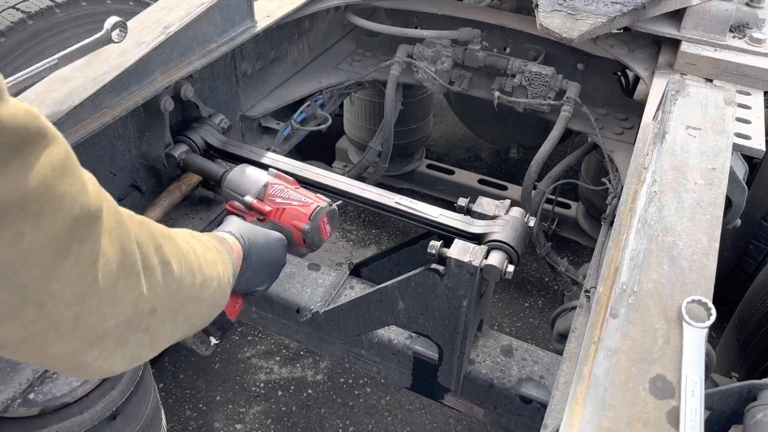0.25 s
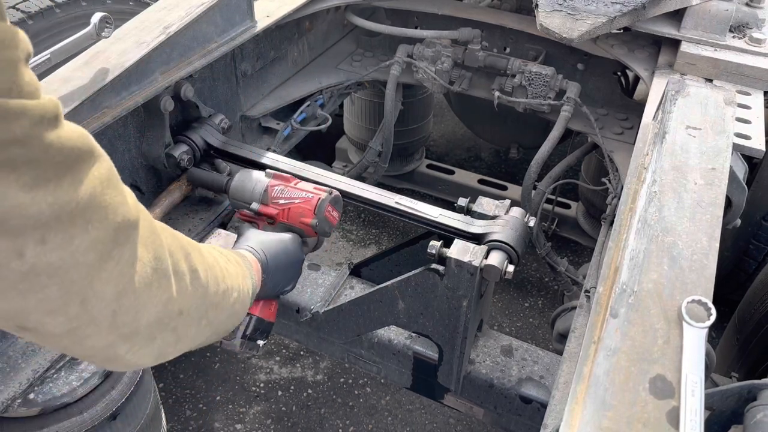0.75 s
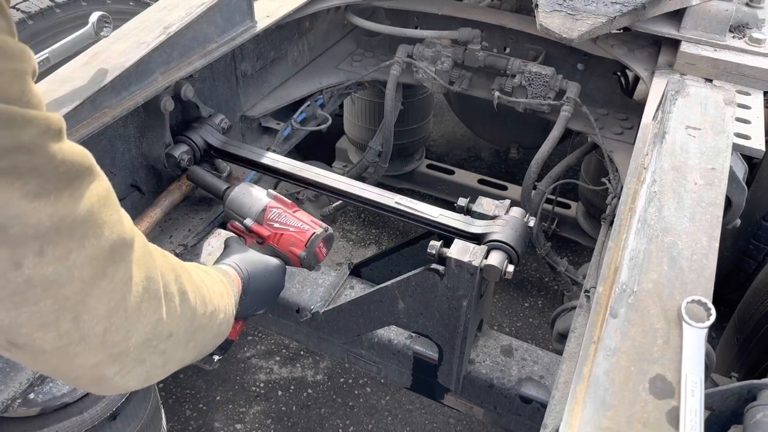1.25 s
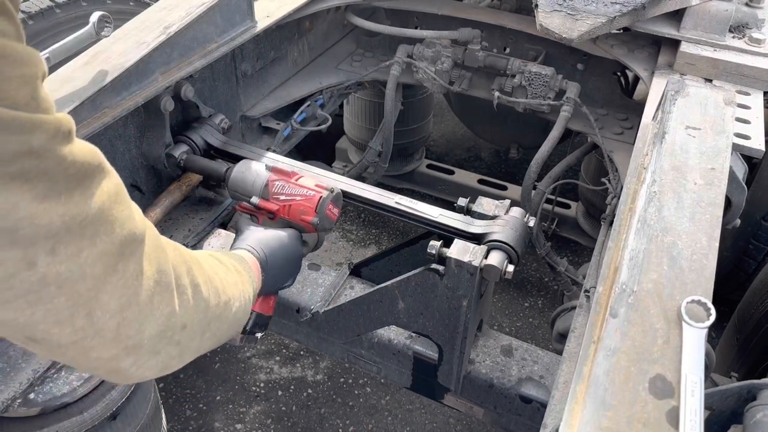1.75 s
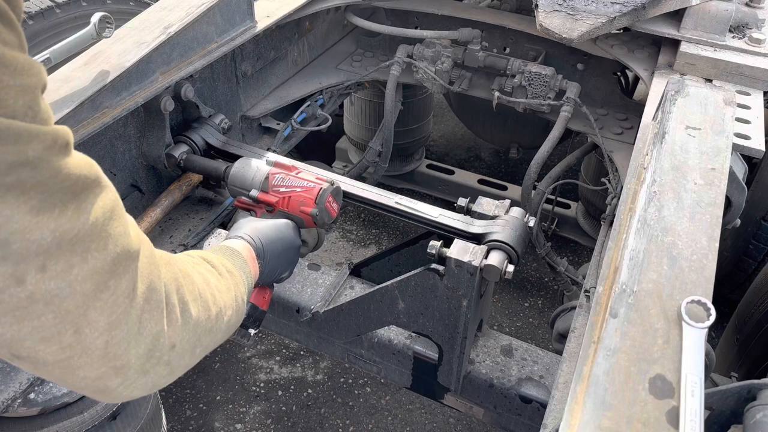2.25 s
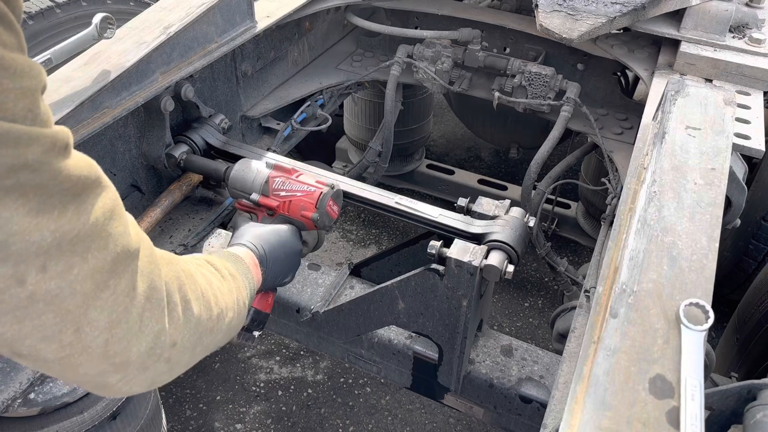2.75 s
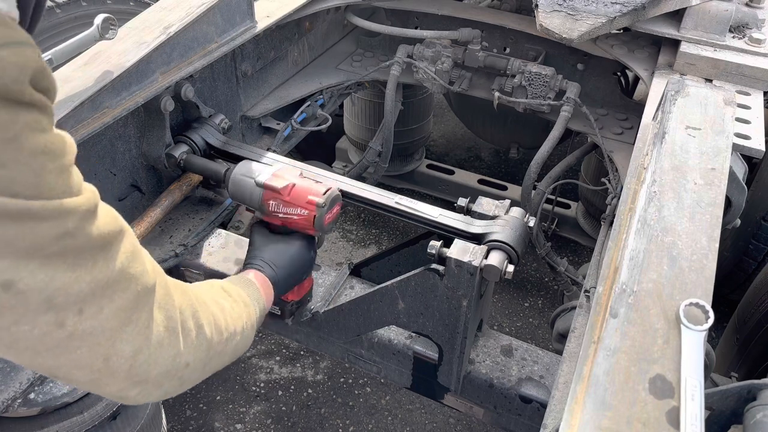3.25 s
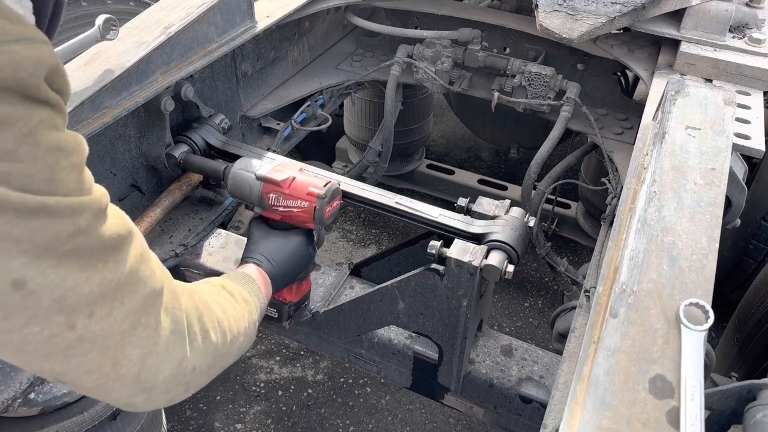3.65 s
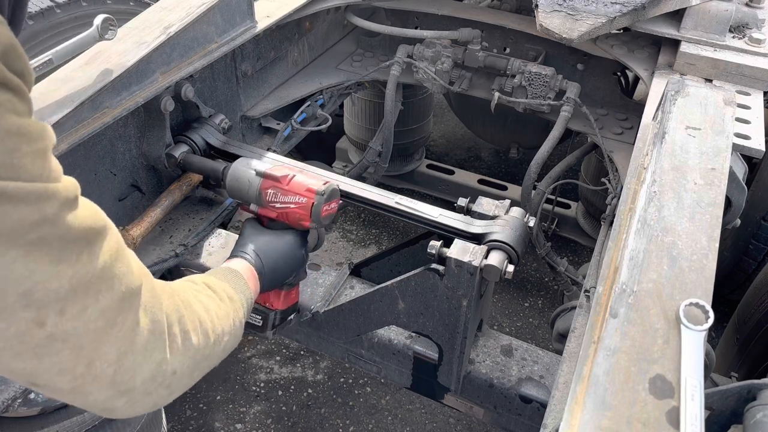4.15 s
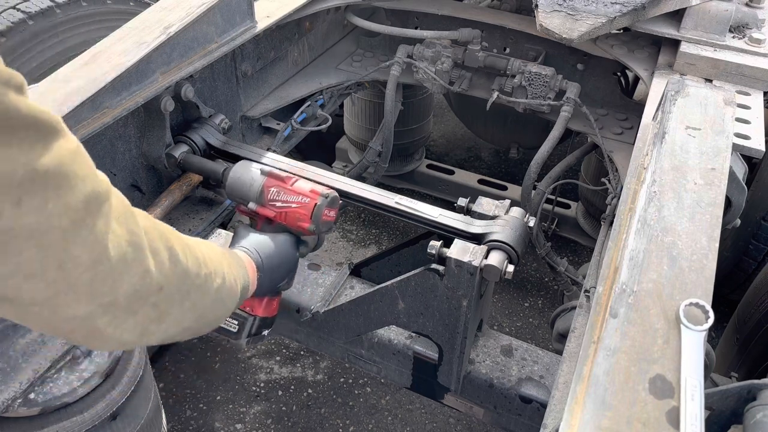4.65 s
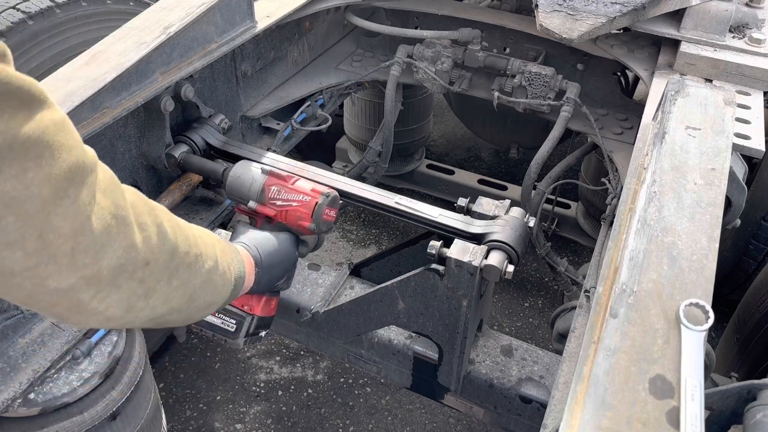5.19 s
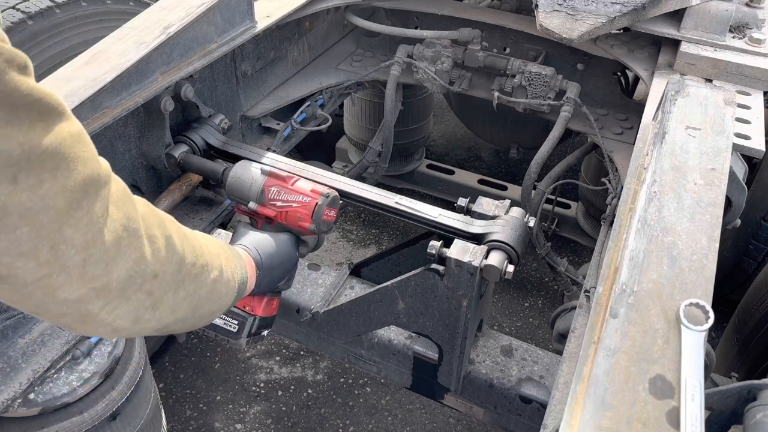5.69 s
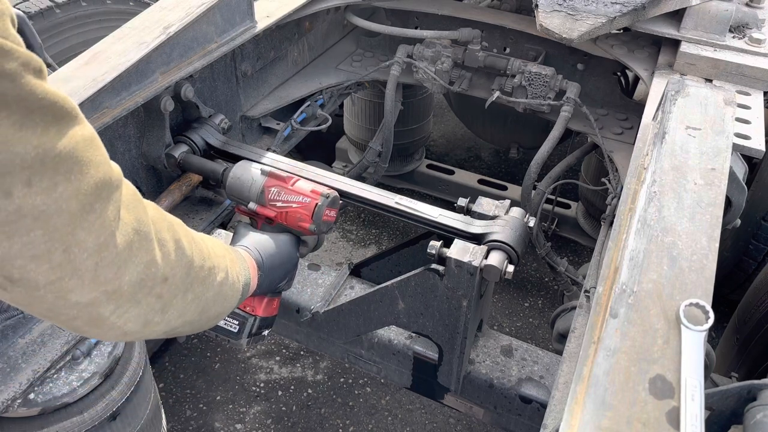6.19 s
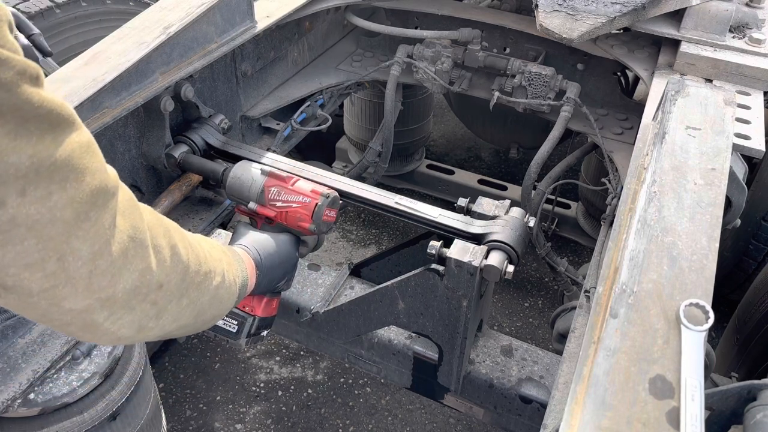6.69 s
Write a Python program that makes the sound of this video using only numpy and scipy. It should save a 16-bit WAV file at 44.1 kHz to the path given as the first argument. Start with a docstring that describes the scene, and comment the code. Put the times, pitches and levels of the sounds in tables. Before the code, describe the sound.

Close stereo pickup in a quiet open yard: irregular metallic knocks with short, dull frame resonance, one sharper clank before a second. A very brief impact wrench burst rattles hard, with a high electric whine and raspy gears. Afterward come fainter bumps, then brighter loose clinks with short grinding rubs. Low wind gusts flutter and thump right on the microphone over faint distant air noise and a thin high whistle.

```python
"""A cordless impact wrench at work outdoors: its socket is knocked onto a bolt in a truck's steel frame.
The motor whines up, the hammer strikes seven blows, then the socket clinks as it is worked on the bolt head.
Contacts are noise bursts plus decaying modes; the motor is tones and rasping noise; slides are runs of slips.
Close to the microphone gusts buffet its two ports; behind lie a quiet yard and a thin whistle."""
import sys
import numpy as np
from scipy import signal
from scipy.fft import rfft, irfft, next_fast_len
from scipy.io import wavfile
from scipy.ndimage import uniform_filter1d

SR = 44100
rng = np.random.default_rng(int(sys.argv[2]) if len(sys.argv) > 2 else 0)


def store_wav(level_fs):
    """Save 16-bit WAV to argv[1]."""
    pcm = np.round(np.clip(np.atleast_2d(level_fs), -1, 1) * 32767)
    wavfile.write(sys.argv[1], SR, pcm.T.astype(np.int16))


N = 305480
TIME = np.arange(N) / SR
AGE = TIME[:SR // 4]  # seconds since a touch

# Hammer on anvil, about 38 blows a second. Each row: time in seconds, force in dB,
# hardness in dB per octave, pitch of the spot struck in Hz.
HAMMER_BLOWS = [(2.23, -34, 1.5, 2330), (2.2521, -29, .6, 4400), (2.2817, -29, 0, 2830),
                (2.3085, -29.5, 0.7, 4800), (2.3326, -28, -1.2, 3600), (2.36, -29, -0.5, 1270),
                (2.3871, -30, 0, 3300)]
# Modes of the truck frame. Each row: pitch in Hz, relative level in dB, t60 in seconds.
FRAME_MODES = [(247, -3, .14), (325, -5, .17), (371, -10, .2), (476, -1, .17), (698, -10, .15),
               (782, -10, .13), (984, -11, .12), (1060, -11, .11), (1205, -10, .11), (1340, -10, .11),
               (1489, -4, .1), (1602, -11, .13), (1686, -13, .13), (1839, -9, .13), (1890, -13, .1),
               (2007, -13, .1), (2196, -13, .13), (2304, -9, .14), (2645, -11, .11), (3116, -9, .1),
               (3515, -9, .1), (3651, -9, .11), (3925, -6, .08), (4050, -6, .075), (4194, -9, .085),
               (4325, -14, .11), (4641, -13, .11)]
# Modes of the socket. Each row: pitch in Hz, relative level in dB, t60 in seconds before any damping.
SOCKET_MODES = [(1075, -6, .09), (1275, -13, .09), (1460, -7, .09), (2018, -10, .1), (2304, -11, .11),
                (2589, -13, .1), (2955, -10, .1), (3270, -10, .1), (3332, -20, .2), (3714, -10, .12),
                (3946, -11, .14), (4160, -15, .15), (4870, -7, .1), (4947, -8, .1), (5167, -10, .11),
                (5625, -14, .1), (5883, -16, .1), (6384, -14, .1), (6767, -16, .22), (7430, -13, .14),
                (7607, -14, .1), (7795, -13, .1), (8933, -7, .1), (9212, -8, .11), (9300, -9, .085),
                (11860, -12, .12), (12600, -12, .14), (13320, -11, .16), (14470, -5, .08),
                (15660, -11, .11)]
# How alike the two ports hear diffuse sound. Each row: pitch in Hz, left-right correlation.
LIKENESS = [(50, 0.86), (300, 0.77), (800, 0.27), (1700, 0.38), (4000, 0.42), (6700, 0.45), (9200, 0.8),
            (14000, 0.97)]
# Edges of the thud, clank, clink, tick and fizz ranges, in Hz.
ZONES_HZ = [140, 560, 2500, 5600, 10500, 16500]
RECOIL_DELAY_S = 0.00585  # from the touch to the spring-back


def from_db(db):
    """Decibels to gain."""
    return 10 ** (np.asarray(db) / 20)


def rms_one(x):
    """Scale to rms 1."""
    return x / np.sqrt(np.mean(x ** 2) + 1e-20)


def at_hz(points, hz):
    """Read a table on a log-frequency axis."""
    points = np.array(points)
    return np.interp(np.log(hz + 1e-9), np.log(points[:, 0]), points[:, 1])


def add(out, s, sound):
    """Mix a sound in at time s."""
    start = int(s * SR)
    out[:, start:start + sound.shape[-1]] += sound[..., :N - start]


def noise(spectrum, size):
    """Coloured stereo noise at rms 1, its likeness between the ports set for each pitch."""
    padded = next_fast_len(size)
    hz = np.arange(padded // 2 + 1) * SR / padded
    mid, side = rfft(rng.standard_normal((2, padded)))
    alike = np.clip(at_hz(LIKENESS, hz), -.99, .99)
    both = np.sqrt(1 + alike) * mid + np.sqrt(1 - alike) * side * [[1], [-1]]
    coloured = both * from_db(at_hz(spectrum, hz))
    return rms_one(irfft(coloured, padded)[:, :size])


def drift(rate):
    """Slow chance: straight lines between random values of spread 1, `rate` of them a second."""
    return np.interp(TIME * rate, np.arange(4000), rng.standard_normal(4000))


def band(x, low_hz, high_hz):
    """Causal band-pass."""
    return signal.sosfilt(signal.butter(4, [low_hz, high_hz], "band", fs=SR, output="sos"), x)


def evened(x, span_s):
    """Noise with its slow swings of level taken out."""
    power = uniform_filter1d(np.mean(x ** 2, axis=0), int(span_s * SR))
    return x / np.sqrt(power + 1e-6)


def held(start_s, end_s, attack_s, release_db_per_s):
    """Envelope: swell, hold, die away."""
    swell = np.clip((TIME - start_s) / attack_s, 0, 1) ** 2
    return swell * from_db(-release_db_per_s * np.clip(TIME - end_s, 0, 1))


def mode(hz, t60):
    """A decaying sine; the less alike the ports are at its pitch, the more its phase differs between them."""
    build_cycles = 3.4
    scatter = np.sqrt(-np.log(np.clip(at_hz(LIKENESS, hz), .05, .99)))
    phase = rng.uniform(0, 2 * np.pi) + rng.normal(0, scatter, (2, 1))
    build = 1 - np.exp(-AGE * min(hz, 2500) / build_cycles)
    return np.sin(2 * np.pi * hz * AGE + phase) * from_db(-60 * AGE / t60) * build


def resonant(colour):
    """A spectrum broken up by a steel body's many small resonances, drawn once for each call."""
    hz = np.geomspace(600, 16500, 420)
    peaks_db = rng.normal(0, 5.5, len(hz))
    # level the local power, so that the broad colour stays
    peaks_db = peaks_db - 10 * np.log10(uniform_filter1d(from_db(peaks_db) ** 2, size=9))
    bass = [row for row in colour if row[0] < hz[0]]
    return bass + list(zip(hz, at_hz(colour, hz) + peaks_db + 1.5))


def contact(force_db, hardness, share_db):
    """Level of each range: force lifts them all, hardness tilts those above the clank."""
    centres_hz = np.sqrt(np.multiply(ZONES_HZ[:-1], ZONES_HZ[1:]))
    octaves_up = np.maximum(np.log2(centres_hz / centres_hz[1]), 0)
    return force_db + np.array(share_db) + hardness * octaves_up


def spot_gain_db(hz, spot_hz):
    """The spot that is struck favours the resonances near its own pitch."""
    gain_db, width_octaves = 6.5, 0.19
    return gain_db * np.exp(-(np.log2(hz / spot_hz) / width_octaves) ** 2)


def recoil():
    """The loaded bracket springs back with a short thump, its pitch drawn anew each time."""
    hz = 274 * rng.uniform(.88, 1.12)
    t60_s = 0.033
    return np.sin(2 * np.pi * hz * AGE) * from_db(-60 * AGE / t60_s)


def blow(zone_db, colour, spot_hz, modes, modes_db, snap_db, crack_db, crack_s, damping, echo_db):
    """Steel on steel: a bright snap at first touch, a short crack, the dense ring of the chassis, its clear modes."""
    # Dense ring of the chassis. Each row: pitch in Hz, t60 in seconds before division by the damping.
    decay = [(150, 0.3), (450, 0.21), (1000, 0.17), (2000, 0.11), (4000, 0.14), (8000, 0.11),
             (15000, 0.064)]
    snap_s, echo_delay_s = 0.0016, 0.017
    # a soft contact, with little clink for its clank, already falls off above 1 kHz
    dull_db = min(zone_db[2] - zone_db[1] + 8, 0)
    softness = [(900, 0.0075), (2500, 1.36 * dull_db)]
    colour_hz, colour_db = np.transpose(colour)
    grain_db = colour_db + at_hz(softness, colour_hz) + spot_gain_db(colour_hz, spot_hz)
    grain = noise(np.column_stack([colour_hz, grain_db]), len(AGE))
    out = 0
    echo_age = np.maximum(AGE - echo_delay_s, 0)
    for level_db, low, high in zip(zone_db, ZONES_HZ, ZONES_HZ[1:]):
        hz = np.sqrt(low * high)
        crack = from_db(crack_db) * np.sqrt(hz / 5000) * np.exp(-AGE / crack_s)
        snap = from_db(snap_db) * np.sqrt(hz / 8000) * np.exp(-AGE / snap_s)
        # the truck's body sends back a dull echo
        echo = from_db(echo_db) / (1 + hz / 4000) * (AGE > echo_delay_s) * np.exp(-echo_age / 0.013)
        ring = from_db(-60 * AGE * damping / at_hz(decay, hz))
        # heavy parts take about a cycle to get moving
        onset = 1 - np.exp(-AGE * hz / 1.35)
        part = band(grain * (snap + crack + ring + echo) * onset, low, high)
        out = out + from_db(level_db) * part / np.std(part[:, :SR // 30])
    for hz, level_db, t60 in modes:
        zone = np.searchsorted(ZONES_HZ[1:-1], hz)
        drive_db = zone_db[zone] + (zone == 1) * at_hz(softness, hz) + .5 * spot_gain_db(hz, spot_hz)
        contact_db = rng.uniform(-5, 3)
        out = out + from_db(drive_db + level_db + modes_db + contact_db) * mode(hz, t60)
    return out


def yard():
    """Distant outdoor noise, gently rising and falling."""
    # Colour of the yard air. Each row: pitch in Hz, relative level in dB per Hz.
    air_colour = [(30, -10), (70, -4), (124, -6.5), (190, -18.5), (330, -14), (550, -18), (1100, -23),
                  (2000, -32), (3500, -42), (6000, -47), (8000, -46), (9700, -40.5), (11000, -58),
                  (13000, -58.5), (16000, -52)]
    level_db, swell_db = -52.5, 0.42
    air = noise(air_colour, N)
    level = from_db(level_db + swell_db * drift(7))
    return level * air / np.std(band(air, 400, 16000))


def whistle():
    """A thin, slightly hoarse electronic whistle: steady sines whose phase wanders."""
    # Steady tones. Each row: pitch in Hz, level in dB, rate of the phase wander in Hz.
    steady_tones = [(8473, -83, 30), (14363, -67, 90)]
    return sum(from_db(db) * np.sin(2 * np.pi * hz * TIME + .8 * drift(spread))
               for hz, db, spread in steady_tones)


def wind():
    """Lumpy pressure on the ports, brighter as it blows harder; single eddies swell and die in a cycle or two."""
    # Strength of the wind at the microphone. Each row: time in seconds, dB before the puffs.
    strength = [(0.0, -47), (0.13, -44), (0.55, -38), (0.8, -39.5), (1.41, -41), (1.49, -31), (1.64, -26),
                (1.68, -30.5), (1.76, -27.5), (1.9, -28), (1.98, -34.5), (2.12, -40.5), (2.24, -32),
                (2.31, -44.5), (3.14, -36.5), (3.18, -47), (3.37, -34), (3.63, -59.5), (4.01, -48),
                (4.26, -34), (4.3, -44), (4.75, -36), (4.82, -46.5), (4.98, -34), (5.05, -54),
                (5.15, -33.5), (5.19, -32), (5.27, -28), (5.56, -40.5), (5.61, -34), (5.83, -45),
                (5.89, -32), (5.94, -32.5), (6.08, -24.5), (6.23, -26.5), (6.31, -40), (6.35, -31.5),
                (6.42, -33.5), (6.5, -35.5), (6.56, -29.5), (6.65, -33), (6.72, -29), (6.82, -32.5),
                (6.93, -28.5)]
    # The strongest eddies hit the microphone. Each row: start in seconds, peak in dB, pitch in Hz.
    buffets = [(1.602, -13, 186), (1.62, -13.5, 182), (1.703, -16, 70), (1.749, -13.5, 101.3),
               (1.776, -7.5, 115.4), (1.781, -17.5, 270), (1.834, -6, 190), (1.85, -14.5, 90.5),
               (1.905, -17, 186), (2.785, -25, 156), (2.994, -20.5, 131), (3.36, -20, 213),
               (4.655, -21, 137), (4.94, -21.5, 142), (5.254, -18, 133), (5.267, -16, 138),
               (5.888, -17.5, 116), (5.922, -23, 168), (6.029, -14, 336), (6.057, -15, 94),
               (6.083, -8, 138), (6.087, -8, 405), (6.135, -22, 140), (6.185, -8.5, 128.4),
               (6.216, -5, 146), (6.218, -15, 414), (6.245, -19, 190), (6.349, -22, 274),
               (6.368, -19.5, 285), (6.381, -18.5, 323), (6.547, -20.5, 132), (6.618, -12.5, 212),
               (6.701, -20.5, 297), (6.724, -15.5, 357), (6.744, -22.5, 338), (6.793, -24.5, 340),
               (6.87, -22, 294)]
    # Colours of the rumble and the flutter. Each row: pitch in Hz, relative level in dB per Hz.
    rumble_colour = [(20, -32), (35, 4), (55, 30), (75, 28.5), (130, 21.5), (190, -49.5)]
    flutter_colour = [(100, 2.5), (140, 4), (250, -3), (350, -8), (480, -17.5), (750, -29), (1500, -45.5),
                      (4000, -112)]
    eddy_cycles, puff_db, lump_db = 0.79, 2.0, 4.0
    # relative to the wind; flutter gains extra dB for each dB above a light breeze
    rumble_db, flutter_db, flutter_growth, breeze_db = 0.5, -4, 0.88, -37
    wind_db = np.interp(TIME, *np.transpose(strength)) + puff_db * drift(18)
    rumble = from_db(wind_db + rumble_db)
    flutter = from_db(wind_db + flutter_db + flutter_growth * np.maximum(wind_db - breeze_db, 0))
    lumps = from_db(lump_db * drift(55))
    low = evened(noise(rumble_colour, N), .06)
    high = evened(noise(flutter_colour, N), .03)
    out = rumble * low + flutter * high * lumps
    for s, peak_db, hz in buffets:
        swell = AGE * hz / eddy_cycles
        eddy_colour = [(hz / 2, -10), (hz * 1.5, 0), (hz * 3, -30), (hz * 10, -74), (hz * 40, -100)]
        swirl = np.sin(2 * np.pi * hz * AGE) + .25 * noise(eddy_colour, len(AGE))
        add(out, s, from_db(peak_db) * swell ** 2 * np.exp(2 - 2 * swell) * swirl)
    return out


def knocks():
    """The heavy tool bumps the bolt and the whole frame answers."""
    # The socket knocks on bolt and frame, and a faint brush at 2.654 s. Each row: time in seconds, force in dB,
    # hardness as treble slope in dB per octave, pitch of the spot struck in Hz.
    bumps = [(0.267, -29, -6, 1300), (0.385, -59.5, 1, 2700), (0.463, -39, -13.5, 1310),
             (0.505, -51.5, -4.5, 1000), (0.523, -39.5, -11.5, 1490), (0.537, -39.5, -14, 1300),
             (0.555, -36.5, -3, 1260), (0.612, -41.5, -12, 1400), (0.708, -20.5, -3.5, 1840),
             (1.186, -35, -6.5, 1680), (1.243, -41.5, -9, 1300), (1.265, -39.5, -5.5, 1720),
             (1.329, -38.5, -6, 646), (1.521, -26, -7.5, 820), (1.575, -36.5, -7, 680),
             (1.632, -38.5, -12, 1600), (1.693, -50, -10.5, 1000), (1.855, -37.5, -13.5, 1110),
             (1.998, -60.5, -0.5, 2650), (2.654, -60.5, -3, 2340), (3.03, -35, -3, 4030),
             (3.102, -57, -4.5, 3400), (3.262, -56.5, -6.5, 1800), (3.351, -54, -6.5, 1610),
             (3.37, -41, -7.5, 1030), (3.407, -51, -12, 1600), (3.706, -51.5, -11.5, 740),
             (3.938, -46.5, -10.5, 820), (3.962, -47.5, -19, 800), (4.116, -36, -11.5, 1610),
             (4.221, -68, -2, 1700), (4.376, -65.5, 2, 4060), (4.395, -72.5, 4, 8950)]
    # Colour of a knock. Each row: pitch in Hz, relative level in dB per Hz.
    knock_colour = [(71, -32), (120, 8.5), (330, 2.5), (420, -8.5), (592, -11.5), (800, -9.5), (1100, -10),
                    (1400, -6), (1720, -8.5), (2700, -7.5), (3200, -7.5), (3950, -14.5), (4800, -21),
                    (5500, -38.5), (6100, -41), (6900, -43), (8600, -33), (9800, -35), (10700, -43.5),
                    (11500, -50), (13400, -59), (14600, -34.5), (16000, -65)]
    # A knock's force shared among thud, clank, clink, tick and fizz, in dB.
    share_db = [-1, -0.8, -5.5, 0, -5]
    recoil_db = 12.0
    out, body = np.zeros((2, N)), resonant(knock_colour)
    for s, force_db, hardness, spot_hz in bumps:
        zone_db = contact(force_db, hardness, share_db)
        add(out, s, blow(zone_db, body, spot_hz, FRAME_MODES, modes_db=5.0, snap_db=4.0,
                         crack_db=12.0, crack_s=0.01, damping=0.74, echo_db=-7.0))
        add(out, s + RECOIL_DELAY_S, from_db(force_db + recoil_db) * recoil())
    return out


def sliding():
    """Steel rubs on steel: a run of tiny slips of uneven size, each ringing briefly."""
    # The socket slides on the bolt. Each row: start in seconds, end in seconds, level in dB.
    slides = [(0.473, 0.605, -39.5), (5.179, 5.275, -43)]
    slips_per_s, slip_ring_s = 93, 0.02
    slips = (rng.random(N) < slips_per_s / SR) * from_db(rng.normal(0, 3.5, N))
    # slip energies add up and decay
    ring_pole = np.exp(-2 / (slip_ring_s * SR))
    grit = np.sqrt(signal.lfilter([1], [1, -ring_pole], slips ** 2 + 1e-3))
    scrape_colour = [(200, -25), (450, 11.0), (1400, 8.5), (2600, -4), (5000, -23), (9000, -17), (15000, -41)]
    scrape = grit * noise(resonant(scrape_colour), N)
    level = sum(from_db(db) * held(start, end, attack_s=0.049, release_db_per_s=168)
                for start, end, db in slides)
    return evened(scrape, 0.36) * level


def squeals():
    """Friction feeds several resonances, overlapping in time: each a wavering squeak that sags as the slip slows."""
    # Faint squeals of the slipping socket. Each row: start in seconds, end in seconds, mean pitch in Hz, level in dB.
    squeaks = [(0.88, 1.09, 4440, -69), (0.995, 1.08, 2640, -61), (0.96, 1.19, 3350, -67),
               (1.01, 1.165, 1815, -57)]
    sag, waver, width = 0.025, .006, 0.12  # shares of the pitch
    hoarse_db = -3
    out = np.zeros((2, N))
    for start, end, hz, db in squeaks:
        size = int(max(end - start, .02) * SR)
        progress = np.linspace(0, 1, size)
        pitch = hz * (1 + sag * (.5 - progress) + waver * drift(42.5)[:size])
        grip = from_db(3.5 * drift(70)[:size])
        # a hoarse skirt of noise around the pitch
        skirt_filter = signal.butter(2, hz * width / 2, fs=SR, output="sos")
        friction = signal.sosfilt(skirt_filter, rng.standard_normal((2, 2, size)))
        phase = 2 * np.pi * np.cumsum(pitch) / SR
        skirt = rms_one(friction[0] * np.sin(phase) + friction[1] * np.cos(phase))
        squeak = grip * np.sin(phase) + from_db(hoarse_db) * skirt
        add(out, start, from_db(db) * np.sin(np.pi * progress) * squeak)
    return out


def motor():
    """The drive's switching tones grow with speed and sink under load; gears rasp, most as the hammer rides its cam."""
    # Switching tones. Each row: pitch in Hz, dB at the start, dB gained at full speed.
    switching_tones = [(7580, -56, 9), (7730, -53, 8), (15330, -55, 7), (15472, -51, 1.5), (15560, -59, 7)]
    trigger_on_s, trigger_off_s, spin_up_s, coast_db_per_s = 2.117, 2.39, 0.093, 445
    load_drop_db = 6
    gears_db, gears_rise_db = -38.5, 17.5  # at full speed, and how much quieter they start
    cam_db, cam_s = 13, 0.004  # the rasp swells before each blow
    speed = np.clip((TIME - trigger_on_s) / spin_up_s, 0, 1)
    loaded = np.clip((TIME - HAMMER_BLOWS[0][0]) / cam_s, 0, 1)
    tones = 0
    for hz, db, rise_db in switching_tones:
        level = from_db(db + rise_db * speed - load_drop_db * loaded)
        tones = tones + level * np.sin(2 * np.pi * hz * TIME + .5 * drift(90))
    cam = sum((TIME < s) * np.exp(-np.abs(s - TIME) / cam_s) for s, *_ in HAMMER_BLOWS)
    gears = from_db(gears_db - gears_rise_db * (1 - speed ** 5) + cam_db * cam)
    rasp = noise([(100, 2), (250, 19.5), (700, -3), (1800, -7), (2800, 13.0), (3600, -7),
                  (6500, -11), (10500, 0.0), (14000, -23)], N)
    roughness = 1 + .5 * np.sin(2 * np.pi * 310 * TIME)
    running = held(trigger_on_s, trigger_off_s, attack_s=0.0035, release_db_per_s=coast_db_per_s)
    return running * (tones + gears * rasp * roughness)


def hammer():
    """Each blow cracks on the anvil; a moment later the twisted bracket springs back with a thump and hums on."""
    # Colour of a hammer blow. Each row: pitch in Hz, relative level in dB per Hz.
    hammer_colour = [(71, -34), (120, 6.5), (301, 10), (393, -10.5), (473, 3.5), (569, -21), (698, -7),
                     (892, -12.5), (1290, -12.5), (1900, -13.5), (2750, -17), (3310, -19), (3650, -17),
                     (4900, -22), (6600, -29), (8300, -21.5), (9600, -20.5), (11500, -39), (16000, -32)]
    # A blow's force shared among thud, clank, clink, tick and fizz, in dB.
    share_db = [6.5, 2, -0.2, -3.5, -7]
    # the first blows only take up slack and shake the frame less
    slack_db, slack_s = 5.5, 0.11
    recoil_db, bracket_db = 16.0, 1.0
    out, body = np.zeros((2, N)), resonant(hammer_colour)
    for s, force_db, hardness, spot_hz in HAMMER_BLOWS:
        thud_db, *upper_db = contact(force_db, hardness, share_db)
        thud_db = thud_db - slack_db * np.exp(-(s - HAMMER_BLOWS[0][0]) / slack_s)
        add(out, s, blow([thud_db, *upper_db], body, spot_hz, FRAME_MODES, modes_db=3.5, snap_db=-3.0,
                         crack_db=6.5, crack_s=0.0053, damping=0.77, echo_db=-12.0))
        bracket = mode(480, .17)
        spring_back = from_db(recoil_db) * recoil() + from_db(bracket_db) * bracket
        add(out, s + RECOIL_DELAY_S, from_db(thud_db) * spring_back)
    return out


def clinks():
    """Light touches ring the socket; the point of contact picks which pure ring sings until the next touch chokes it."""
    # The loose socket rattles on the bolt head. Each row: time in seconds, force in dB, hardness in dB per octave,
    # contact from -1 (high ring) to +1 (bell ring), pitch of the spot struck in Hz.
    touches = [(4.74, -26.5, -6.5, -0.64, 1160), (4.986, -34.5, -2.5, -0.3, 2940),
               (5.069, -39.5, -2.3, 0.51, 3200), (5.219, -40, -7.5, .2, 1430),
               (5.231, -41.5, -4, 0.15, 2290), (5.29, -40, 2, -0.23, 4950), (5.3, -45.5, 2.5, -0.054, 3170),
               (5.376, -42, -6, 0.081, 2350), (5.47, -49, -4, 0.3, 4900), (5.474, -30.5, -1.56, 1, 3160),
               (5.771, -45, -12.5, 0.17, 1060), (5.841, -32, -1, 0.28, 3120),
               (5.871, -38.5, -9, -0.18, 1050), (5.977, -34.5, -8.5, .1, 1510),
               (6.678, -40.5, -7, 0.077, 1320), (6.714, -54, -7, 0.5, 4900)]
    # Colour of a clink. Each row: pitch in Hz, relative level in dB per Hz.
    clink_colour = [(300, 6.5), (500, 3.5), (900, 8), (1050, 12), (1200, 3), (1450, 7.5), (1750, 6.5),
                    (2500, 1.5), (3200, 0.5), (4300, 0), (4900, 3), (5800, -7), (6700, -3.5), (7300, -8),
                    (9400, -7), (11000, -27), (13500, -26), (14600, -22), (16000, -39)]
    # A clink's force shared among thud, clank, clink, tick and fizz, in dB.
    share_db = [-8.5, -1.5, 0.5, 2.4, -7.5]
    # The socket's two purest rings. Each row: pitch in Hz, relative level in dB, t60 in seconds before choking.
    bell_modes = [(6595, -5, .085), (6590, -39, .4), (6747, -3, .07), (6850, -8, .06)]
    high_modes = [(9222, -8, .11), (10030, 1, .21), (11810, -16, .1), (15670, -14, .15)]
    bell_db, high_db = 23.5, 15.5  # at full contact, relative to the tick
    choke_s = 0.012
    out, body = np.zeros((2, N)), resonant(clink_colour)
    next_touches = [row[0] for row in touches[1:]] + [N / SR]
    for (s, force_db, hardness, place, spot_hz), next_s in zip(touches, next_touches):
        zone_db = contact(force_db, hardness, share_db)
        add(out, s, blow(zone_db, body, spot_hz, SOCKET_MODES, modes_db=8.0, snap_db=-19.0,
                         crack_db=5.0, crack_s=0.013, damping=0.72, echo_db=-9.5))
        bell = sum(from_db(bell_db + db) * mode(hz, t60) for hz, db, t60 in bell_modes)
        high_ring = sum(from_db(high_db + db) * mode(hz, t60) for hz, db, t60 in high_modes)
        choke = np.exp(-np.maximum(s + AGE - next_s, 0) / choke_s)
        pure_ring = bell if place > 0 else high_ring
        add(out, s, from_db(zone_db[3]) * abs(place) * choke * pure_ring)
    return out


def rubbing():
    """The socket grinds round on the bolt head: a dense run of slips keeps its modes ringing, one above all."""
    # Spells of grinding. Each row: start in seconds, end in seconds, level in dB.
    rubs = [(5.191, 5.273, -39.5), (5.343, 5.38, -54), (5.447, 5.477, -48), (5.936, 5.99, -52)]
    sing_hz, sing_t60_s, sing_db = 4870, 0.056, 7.5  # t60 before the damping
    slips_per_s, damping_s, treble_db_per_octave = 730, 0.008, -6.5
    slips = (rng.random(N) < slips_per_s / SR) * rng.standard_normal(N)
    ring = sum(from_db(db + treble_db_per_octave * np.log2(hz / sing_hz)) * mode(hz, t60)
               for hz, db, t60 in SOCKET_MODES)
    # the pressed contact damps every ring
    ring = (ring + from_db(sing_db) * mode(sing_hz, sing_t60_s)) * np.exp(-AGE / damping_s)
    ringing = evened(signal.fftconvolve(slips[None], ring, axes=1)[:, :N], .03)
    level = sum(from_db(db) * held(start, end, attack_s=0.029, release_db_per_s=423)
                for start, end, db in rubs)
    return ringing * level


def ports(x):
    """The two microphone ports hear the scene with a level and phase difference that depends on pitch."""
    # Phase lead of the left port. Each row: pitch in Hz, lead in radians.
    left_leads = [(60, 0.05), (300, -0.18), (800, 0.6), (1800, 0.65), (4000, 1.3), (6700, 1.53),
                  (9000, 1.94), (10100, 1.1), (12000, -0.057), (14400, -1.4)]
    # Level of the left port over the right. Each row: pitch in Hz, difference in dB.
    left_louder = [(300, 0.6), (800, 2.5), (1800, 1), (4000, 2.3), (6700, 5), (9200, 0.9), (14000, 0)]
    padded = next_fast_len(N + SR // 10)
    hz = np.arange(padded // 2 + 1) * SR / padded
    # each port takes half of the difference
    left = from_db(at_hz(left_louder, hz) / 2) * np.exp(1j * at_hz(left_leads, hz) / 2)
    return irfft(rfft(x, padded) * np.array([left, 1 / left]), padded)[:, :N]


def scene():
    """The tool works a little left of centre; the wind blows straight on the ports."""
    tool = knocks() + clinks() + hammer() + motor() + sliding() + rubbing() + squeals()
    return ports(tool + yard() + whistle()) + wind()


def record(dry):
    """The microphone sheds the deepest rumble, the largest peaks are rounded and the top is cut."""
    cutoff_hz = 16300
    dry = signal.sosfilt(signal.butter(4, 39, "high", fs=SR, output="sos"), dry)
    rounded = dry / (1 + (dry / .8) ** 4) ** .25
    return signal.sosfilt(signal.ellip(10, .1, 80, cutoff_hz, fs=SR, output="sos"), rounded)


dry = scene()
out = record(dry)
store_wav(out)
```